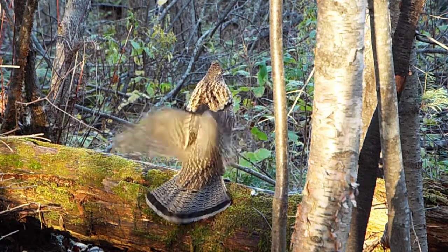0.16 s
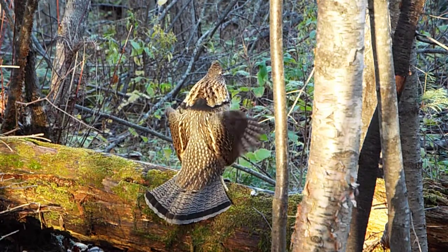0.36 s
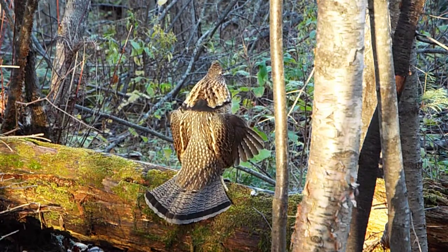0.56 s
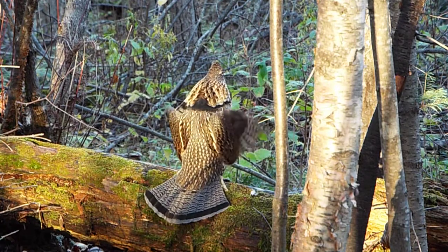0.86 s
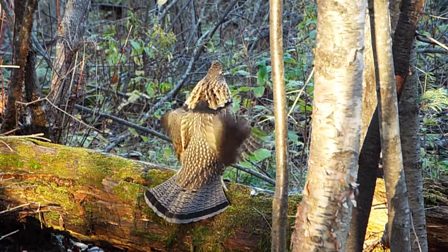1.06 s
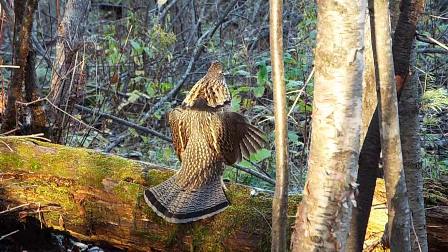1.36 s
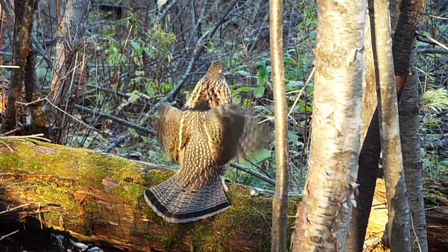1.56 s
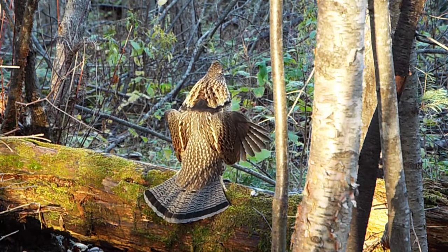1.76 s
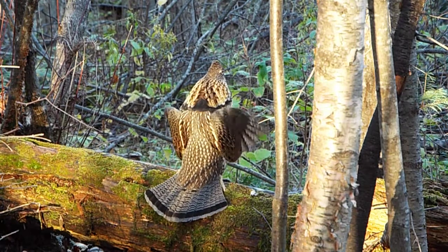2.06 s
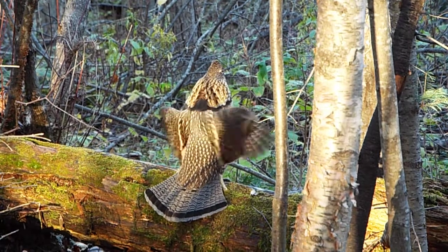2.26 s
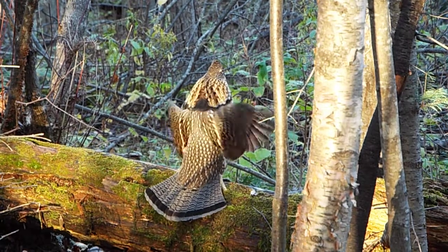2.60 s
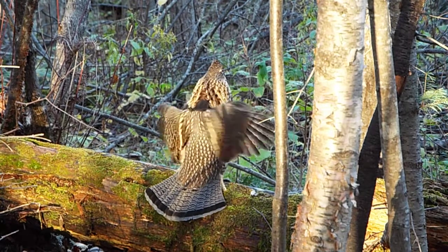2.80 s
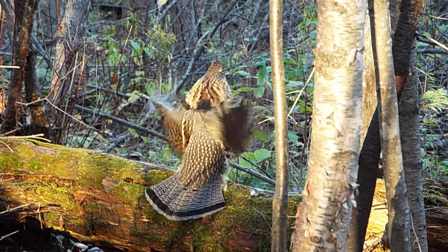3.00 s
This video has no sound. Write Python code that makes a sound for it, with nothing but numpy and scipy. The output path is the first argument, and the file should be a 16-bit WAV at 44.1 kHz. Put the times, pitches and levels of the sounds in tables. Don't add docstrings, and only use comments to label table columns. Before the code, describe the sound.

Soft low wing thumps of a grouse gradually quicken under camera whine, with one loud rattle

```python
import sys
import numpy as np
from scipy import signal
from scipy.fft import rfft, irfft, next_fast_len
from scipy.io import wavfile
from scipy.ndimage import map_coordinates

SR = 44100
rng = np.random.default_rng(int(sys.argv[2]) if len(sys.argv) > 2 else 0)


def store_pcm(level_fs):
    pcm = np.round(np.clip(level_fs, -1, 1) * 32767).astype(np.int16)
    wavfile.write(sys.argv[1], SR, np.atleast_2d(pcm).T)


def volts(x):
    e = np.asarray(x, float) / 20
    return 10 ** e


N = 138474
TIME = np.arange(N) / SR


def along(points, hz):
    f, v = np.transpose(points)
    return np.interp(np.log(hz + 1), np.log(f + 1), v)


def unit(x):
    return x / np.sqrt(np.mean(x ** 2) + 1e-20)


def bump(t, width):
    return np.exp(-(t / width) ** 2 / 2)


def wobble(rate):
    knots = rng.standard_normal(int(N * rate / SR) + 4)
    return map_coordinates(knots, [TIME * rate])


def filtered(x, response):
    m = next_fast_len(N + SR // 2)
    return irfft(rfft(x, m) * response(np.fft.rfftfreq(m, 1 / SR)), m)[..., :N]


def white(channels):
    return rng.standard_normal((channels, N)) * np.sqrt(SR / 2)


def shell(x, modes):
    # (frequency [Hz], lead [rad])
    right_lead = [(900, 0.43), (1250, 1.93), (1650, 2.07), (2000, 0), (3200, 1.7), (4500, 1)]

    def ports(f):
        both_ports = 0
        for k, (center, bandwidth, left_db, right_db) in enumerate(modes):
            resonance = 1j * f * bandwidth / (center * center - f * f + 1j * f * bandwidth)
            both_ports = both_ports + (-1) ** k * volts([[left_db], [right_db]]) * resonance
        return both_ports * [np.ones_like(f), np.exp(1j * along(right_lead, f))]
    return filtered(x, ports)


def forest_air():
    # (frequency [Hz], level [dB per Hz])
    air_spectrum = [(30, -116), (70, -107), (130, -106), (200, -106), (600, -92.5), (1400, -107),
                    (3000, -103), (15000, -109)]
    # (frequency [Hz], correlation [-1..1])
    air_likeness = [(60, .8), (300, .5), (700, .5), (2000, .2), (8000, .28), (15000, .25)]
    # (frequency [Hz], left over right [dB])
    air_balance = [(100, 3), (3000, 3.5), (8000, -0.2), (15000, 2)]

    def angle(f):
        return np.arccos(np.clip(along(air_likeness, f), -1, 1)) / 2

    def color(f):
        return volts(along(air_spectrum, f) + [[.5], [-.5]] * along(air_balance, f))

    mid, side = filtered(white(channels=2), lambda f: [np.cos(angle(f)), np.sin(angle(f))])
    return filtered(np.array([mid + side, mid - side]), color)


def leaf_rustle():
    center_hz, width_hz = 5140, 1600
    leaves = filtered(white(channels=2), lambda f: np.exp(-((f - center_hz) / width_hz) ** 2))
    return volts(-104) * bump(TIME - 1.62, 0.049) * leaves


def far_knock():
    start_s, knock_hz, length_s = 1.35, 400, 0.0093
    return volts(-66.5) * bump(TIME - start_s, length_s) * np.sin(2 * np.pi * knock_hz * TIME)


def motor():
    # frequency [Hz], main whine first
    tone_pitches = [1245.6, 1321, 601, 338.5, 240, 120, 2767.2, 3092.3, 5443.1]
    # (left rms [dB], right rms [dB], left lead [rad])
    tone_ports = [(-45.6, -54.9, -1.53), (-61.5, -70.5, -1.5), (-72.5, -78.5, 0), (-79.5, -84.5, 0),
                  (-86, -89, 0), (-88, -91, 0), (-82, -88, -1), (-79, -87, -1.5), (-85, -98, 0)]
    # (time [s], gain [dB])
    load_swell = [(2.03, 0), (2.06, 2.5), (2.15, 5.5), (2.22, 4), (2.3, 2), (2.38, 0)]
    # (frequency [Hz], width [Hz], left [dB per Hz], right [dB per Hz])
    hum_modes = [(610, 94, -99, -100.5), (757, 62, -84.5, -98.5), (846.5, 63, -79.5, -88.5),
                 (1216, 121, -76.5, -85), (1522, 35.6, -73, -90.5), (1601, 63, -75, -85.5),
                 (1791, 190, -80.5, -91.5), (2150, 102, -89, -102), (2790, 510, -90.5, -103),
                 (3156, 105, -81.5, -102), (3353, 215, -91, -105)]
    drift_hz, flutter_db = .8, .7

    slip = 2 * np.pi * np.cumsum(drift_hz * wobble(4.77)) / SR
    tones = []
    for pitch, (left_db, right_db, lead) in zip(tone_pitches, tone_ports):
        strength = np.sqrt(2) * volts([[left_db], [right_db]] + flutter_db * wobble(5))
        phase = 2 * np.pi * pitch * TIME + slip * pitch / tone_pitches[0]
        tones.append(strength * np.sin(phase + [[lead], [0]]))
    load = volts(np.interp(TIME, *np.transpose(load_swell)) * [[1], [0]])
    hum = shell(white(channels=1) * volts(0.76 * wobble(24.73)), hum_modes)
    return tones[0] * load + sum(tones[1:]) + hum


def focus_catch():
    t = np.clip(TIME - 2.0352, 0, None)
    ring_hz = [[2030], [1665]]
    t60_s, rise_s, jerk_s = .022, .0004, .003
    envelope = volts(-14.5 - 60 * t / t60_s) * (1 - np.exp(-t / rise_s))
    click = envelope * np.sin(2 * np.pi * t * ring_hz)
    jerk = volts(-68) * t / jerk_s * np.exp(1 - (t / jerk_s) ** 2 / 2) * (1 - t / jerk_s)
    return click * volts([[0], [-19]]) + jerk * volts([[0], [-3]])


def focus_rattle():
    # (time [s], level [dB])
    drive_effort = [
        (2.0338, -36.5),
        (2.07, -37),
        (2.1, -37.5),
        (2.16, -39.5),
        (2.2, -47),
        (2.27, -48),
        (2.295, -70),
        (2.323, -52),
        (2.36, -73),
    ]
    # (time [s], gain [dB])
    gear_jolts = [(2.044, 4), (2.053, 3), (2.069, 4), (2.076, 3), (2.092, 4), (2.111, 3), (2.121, 4),
                  (2.147, 6), (2.174, 3), (2.193, 3), (2.259, 4)]
    # (frequency [Hz], width [Hz], left [dB], right [dB])
    drive_modes = [(412, 130, -18, -25), (736, 65, -9.5, -19), (850, 100, -11, -21), (1260, 200, -3.5, -26),
                   (1610, 77, -2, -15.5), (1774, 71, 3.5, -16), (2220, 208, -4.5, -25),
                   (2430, 102, -2, -20), (2920, 104, -3, -33), (3160, 126, -1, -24),
                   (3585, 540, -12, -24.5), (4810, 380, -22, -28.5), (6260, 840, -31.5, -49.5),
                   (8100, 400, -37, -37)]
    teeth_per_s, tooth_spread_db, jolt_s = 3200, 2.5, .0025
    low_edge_hz, body_top_hz, high_edge_hz = 310, 1090, 8900

    times, efforts_db = np.transpose(drive_effort)
    steady_db = np.interp(TIME, times, efforts_db, left=-150, right=-150)
    jolts_db = sum(jolt_db * bump(TIME - at, jolt_s) for at, jolt_db in gear_jolts)
    effort = volts(steady_db + 2.5 + jolts_db)

    tooth_hits = rng.random(N) < teeth_per_s / SR
    teeth = tooth_hits * volts(tooth_spread_db * rng.exponential(size=N)) * rng.choice([-1, 1], N)
    grind = rng.standard_normal((3, N))
    shake = unit(teeth) + volts(-1.5) * grind[0] + volts(-7.5) * grind[1:]

    body = filtered(shake, lambda f: 1 / (1 + (f / body_top_hz) ** 8))
    shake = shake - body * (1 - volts(0.93 * (steady_db - efforts_db.max())))

    def band(f):
        return (1j * f / (low_edge_hz + 1j * f)) ** 2 / (1 + (f / high_edge_hz) ** 8)

    shake = filtered(effort * shake, band)
    shell_rms = np.sqrt(np.mean(shell(grind[0], drive_modes)[0] ** 2))
    return shell(shake, drive_modes) / shell_rms


def wings():
    # (time [s], strength [dB], push ahead of pull [s], feather swish [dB])
    wing_beats = [
        (0.1958, -52.5, 0.003, -58),
        (0.69, -51.5, 0.0024, -57.5),
        (1.129, -53, 0.0037, -59),
        (1.5178, -53, 0.0042, -57),
        (1.8648, -52.5, 0.0041, -57),
        (2.179, -54, 0.0052, -58),
        (2.4686, -55, 0.0044, -56),
        (2.734, -54.5, 0.0053, -58),
        (2.977, -53.5, 0.0047, -55.5),
    ]
    # (delay [s], level [dB])
    echo_paths = [
        (0, 0),
        (.0123, -9),
        (.0196, -15),
    ]
    # (frequency [Hz], level [dB])
    feather_spectrum = [(300, 7), (900, -24), (2200, 14.5), (4500, 2), (9000, -11), (15000, -9)]
    pull_s, wake_s = .0012, .0042
    puff_lead_s, puff_rise_s, puff_fall_s = 0.0043, 0.0088, 0.011

    thump, swell = np.zeros(N), np.zeros(N)
    for beat_s, strength_db, lead, swish_db in wing_beats:
        for delay, gain_db in echo_paths:
            t = TIME - beat_s - delay
            push = volts(-2.5) * bump(t + lead, .46 * lead)
            pull = bump(t, pull_s)
            wake = .22 * bump(t - wake_s, pull_s)
            thump += volts(strength_db + gain_db) * (push - pull - wake)
        t = TIME - beat_s + puff_lead_s
        puff = np.where(t < 0, bump(t, puff_rise_s), np.exp(-np.abs(t) / puff_fall_s))
        swell += volts(swish_db) * puff
    shared, left, right = filtered(white(channels=3), lambda f: volts(along(feather_spectrum, f)))
    swish = unit(np.array([shared + left, shared + .7 * right]))
    return thump * volts([[0], [-3.5]]) + swell * swish * volts([[0], [-1.5]])


def scene():
    wood = forest_air() + leaf_rustle() + far_knock()
    camera = motor() + focus_catch() + focus_rattle()
    return wood + camera + wings()


def top_cut(x):
    return signal.sosfilt(signal.butter(12, 15750, fs=SR, output="sos"), x)


def record(dry):
    return top_cut(dry)


dry = scene()
out = record(dry)
store_pcm(out)
```